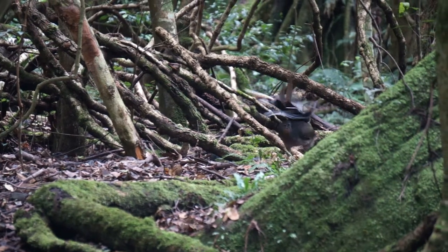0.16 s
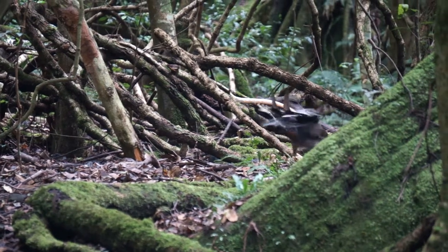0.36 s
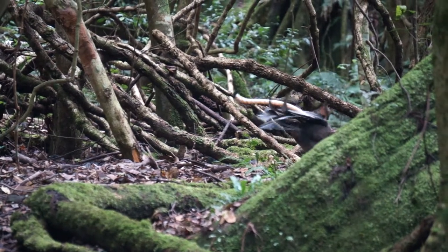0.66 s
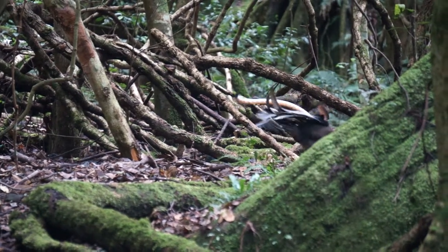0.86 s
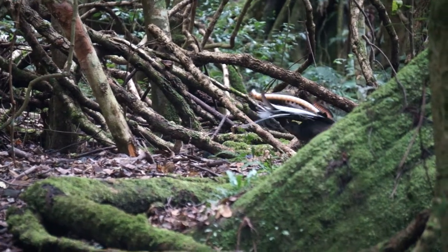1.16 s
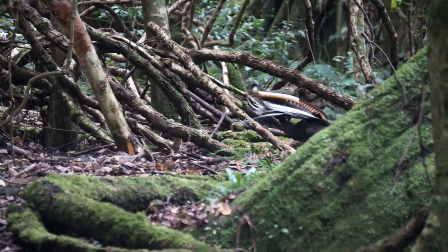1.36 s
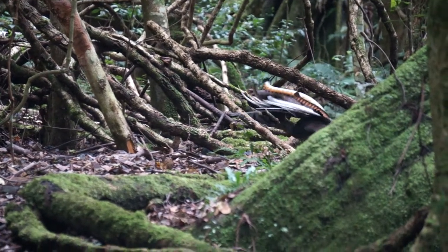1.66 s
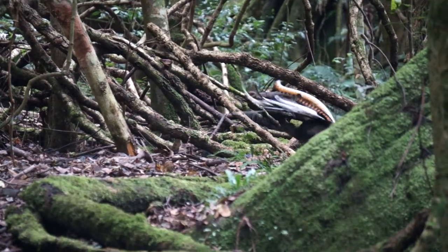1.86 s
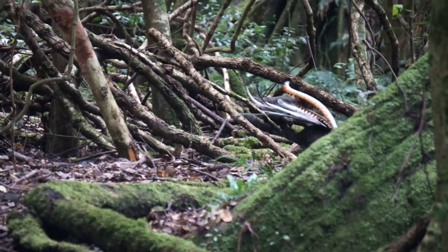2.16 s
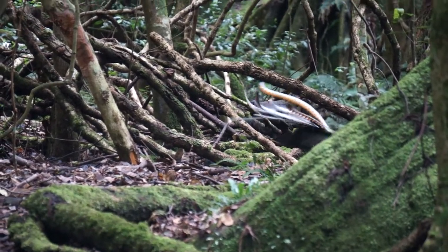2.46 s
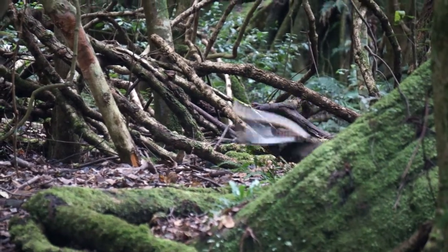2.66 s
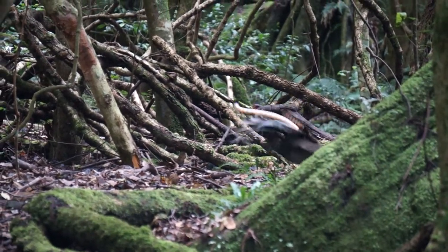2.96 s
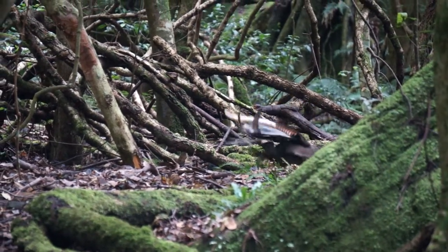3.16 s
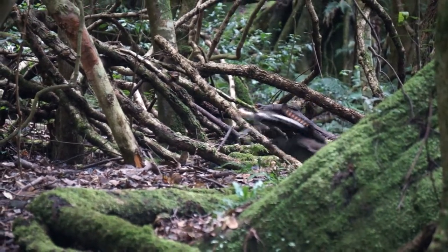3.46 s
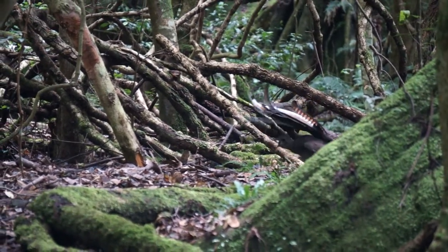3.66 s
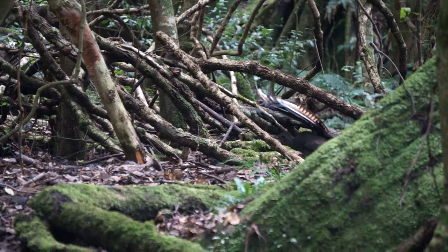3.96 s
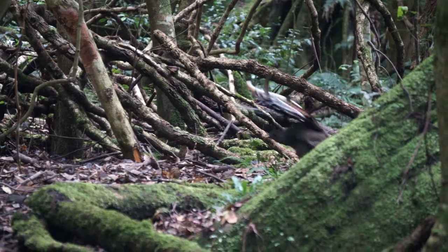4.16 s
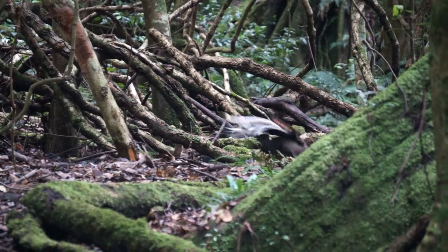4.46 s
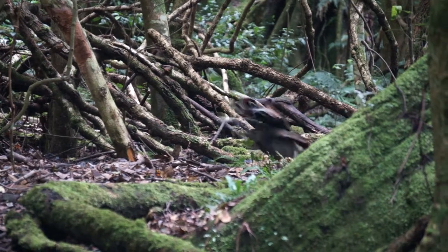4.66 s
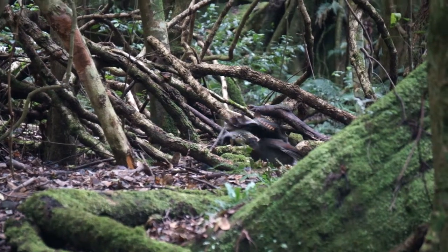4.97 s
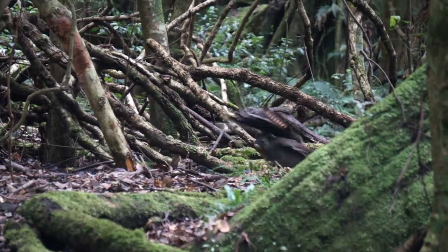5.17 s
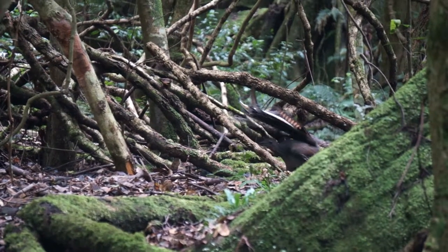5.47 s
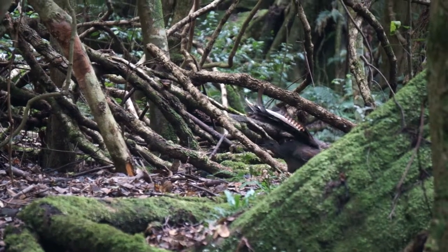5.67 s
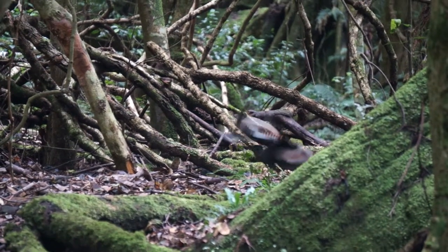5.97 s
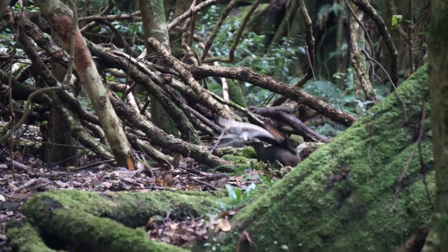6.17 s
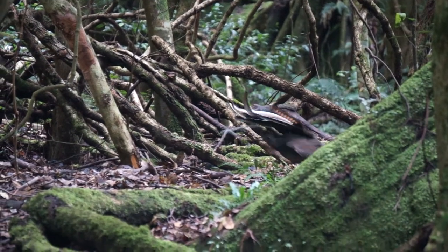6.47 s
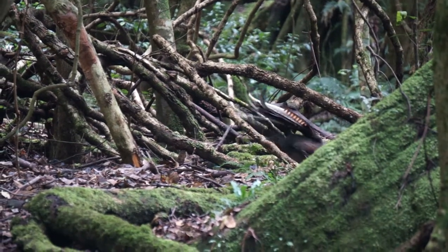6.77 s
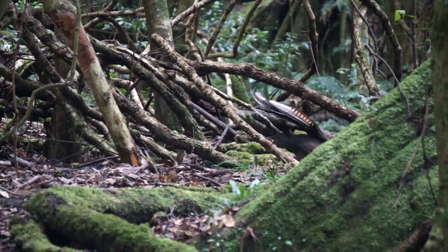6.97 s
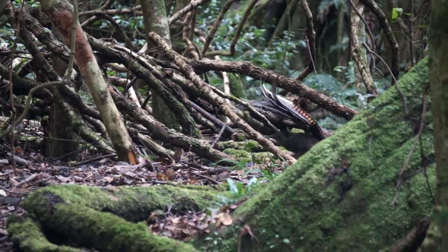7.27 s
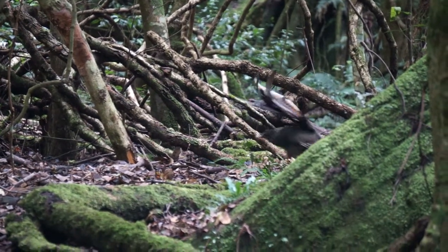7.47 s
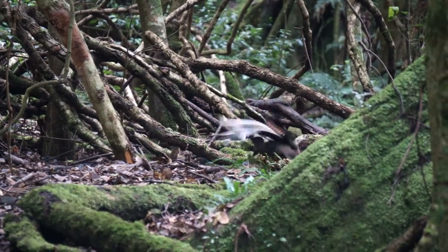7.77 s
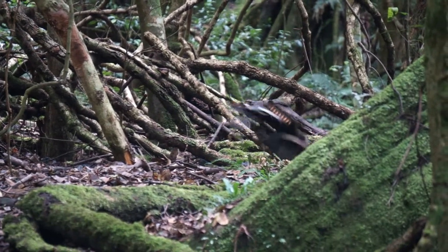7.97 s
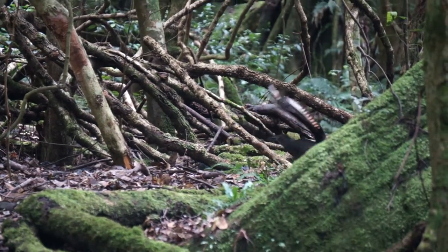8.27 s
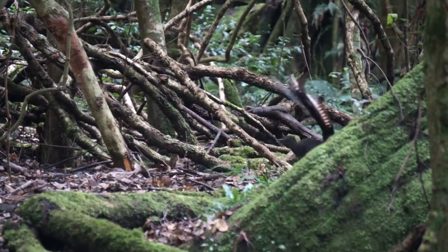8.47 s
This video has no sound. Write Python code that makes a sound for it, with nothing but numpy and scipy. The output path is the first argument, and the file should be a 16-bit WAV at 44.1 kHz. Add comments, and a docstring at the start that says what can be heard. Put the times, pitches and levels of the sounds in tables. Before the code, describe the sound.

A lyrebird dances on a heap of vines in a still rainforest. From 0.1 to 1.4 s come seven irregular clicks, some faint, most sharp: a brief falling woody knock with a whip-like snap and dry crack. Crisp quill rustling and low, fluttering air surround them. At about 2.05, 3.7, 5.35 and 7.0 s a loud note bursts out, near 2 kHz, a tenth of a second of four hard, raspy, pulsing syllables, just preceded by a low soft pip. Echoes scatter off trunks and die within a second. Between calls, pairs of tiny step ticks with feathery swishes (2.7 and 3.15, 4.4 and 4.8, 6.0 and 6.5, 7.6 and 8.1) and isolated softer clicks at 3.3, 5.0, 6.7 and 8.3. Faint high upward slurs repeat about four times a second far away, with occasional thin whistles. Soft gusts swell around 4.3 and 6 s. The background ducks after each call.

```python
"""Lyrebird dance in a rainforest

A lyrebird dances on a heap of vines: sharp clicks (falling knock, snap, dry crack) over rustling tail quills.
Four calls each pair a soft low pip with a loud stuttered note (near-sine pulses and rasp); step ticks between.
Tiny birds whistle far off over a hush, stirred air and gusts of filtered noise; scattered echoes ring.
The recorder's gain ducks under loud peaks and creeps back.
"""
import sys
import numpy as np
from scipy import signal
from scipy.fft import rfft, irfft, next_fast_len
from scipy.io import wavfile
from scipy.ndimage import uniform_filter1d, minimum_filter1d

SR = 44100
rng = np.random.default_rng(int(sys.argv[2]) if len(sys.argv) > 2 else 0)


def to_wav(s):
    """Save 16-bit WAV."""
    ch = np.atleast_2d(s).T  # columns
    pcm = np.round(np.clip(ch, -1, 1) * 32767)  # PCM
    wavfile.write(sys.argv[1], SR, pcm.astype(np.int16))


N = 379701
TIME_S = np.arange(N) / SR

# Left-right correlation of wide sounds: f/Hz, correlation
STEREO_CORRELATION = [(40, 0.65), (100, 0.97), (250, 0.99), (500, 0.76), (1200, 0.73), (2100, 0.71),
                      (4500, 0.75), (10000, 0.82)]

# Forest hush, spectral density: f/Hz, relative level/dB
HUSH_COLOUR = [(24, -42), (40, -23), (75, -13), (118, -1), (160, -5), (250, -2.5), (624, -7), (1050, 2.5),
               (1610, -1.5), (2090, -2.5), (2590, -8), (3520, -11), (5920, -19.5), (7160, -23), (8250, -24),
               (10700, -24), (11500, -41), (15000, -71)]
HUSH_DB = -50

# Air stirred by tail and wings: t of peak/s, half-width/s, level/dB
FLUTTER_SWELLS = [(.78, .78, -53.2), (8.5, .6, -61)]
# Its spectral density: f/Hz, relative level/dB
FLUTTER_SPECTRUM = [(100, -33), (170, 1), (240, 10.5), (340, 5.5), (500, -17), (900, -44.5)]

# Bouts of a tiny bird's upward slur: first t/s, last t/s, period/s
SLUR_BOUT_TIMES = [(.025, 2.45, .238), (2.675, 4.9, .243), (5.68, 8.4, .24)]
# Other far calls: t/s, length/s, f/Hz, level before far trim/dB, pitch flutter/Hz
OTHER_FAR_CALLS = [(1.722, 0.19, 580, -44.5, 4), (1.723, 0.18, 770, -46, 4.5),
                   (2.961, 0.14, 5430, -49.5, 520), (3.164, 0.13, 3910, -44, 66),
                   (3.32, 0.14, 3880, -42, 80), (4.317, 0.13, 3760, -52, 40), (4.93, 0.4, 7405, -57.5, 76),
                   (8.384, 0.16, 5750, -45, 480)]
FAR_PITCH_FALL = .025  # share of pitch

# Scatter from trunks and leaves: f/Hz, level re direct sound/dB
SCATTER_LEVELS = [(600, -20), (1200, -0.5), (2000, -2), (3000, 6.3), (4200, -2), (7000, 8.5), (11000, 2.5)]
# Its decay: f/Hz, t60/s
SCATTER_DECAYS = [(600, 1), (1200, 0.76), (2000, 0.61), (4200, 0.68), (7000, 0.66), (11000, 0.23)]

# Clicks: t/s, knock level/dB, snap level re knock/dB, snap start f/Hz
CLICK_EVENTS = [(0.088, -36, -20, 3500), (0.1346, -24, 0.5, 5200), (0.267, -35.5, -14, 3500),
                (.3741, -25, -2, 3700), (0.6118, -22.5, -2, 5300), (1.0025, -24, 2, 5000),
                (1.3738, -24, -5, 4300), (3.3175, -31, -15, 3700), (4.9812, -29, -15, 3700),
                (6.658, -31, -17, 3700), (8.264, -39, -14, 3700)]
FULL_CLICK_DB = -24  # full effort
KNOCK_HZ, KNOCK_S = 1815, .0041  # at full effort
KNOCK_HZ_PER_DB, KNOCK_S_PER_DB = 10, .00022  # softer: higher, longer

# Dry crack spectrum: f/Hz, relative level/dB
CRACK_COLOUR = [(1500, -14), (3000, 2), (4200, 1), (5600, 0), (6800, 3.5), (8500, -5), (11000, -14.5)]
# Steps: t/s, tick level before trim/dB, swish level before trim/dB
STEP_EVENTS = [(2.7092, -39, -55), (3.1522, -36, -54.5), (4.373, -36, -54.5), (4.816, -39.5, -55.5),
               (6.0327, -41, -57), (6.4911, -36, -53.5), (7.6445, -40, -58), (8.09, -35, -54)]
CRACK_RE_KNOCK_DB = -9  # before tick trim

# Quill ringing bands, spectral density: f/Hz, relative level/dB
QUILL_COLOUR = [(150, -27), (550, -21), (900, -5), (1600, -2), (2600, -2), (3600, -0.5), (4350, 1),
                (5400, -4.5), (6200, -5), (6950, -1.5), (7900, -14), (9000, -11), (10000, -20),
                (11000, -25.5)]
# Tail shakes between clicks: t/s, level before trim/dB
TAIL_SHAKES = [(.72, -41.8), (1.125, -39.8), (1.49, -42.3)]
STRONG_CLICK_DB = -25.8  # full rustle at or above this
RUSTLE_DB, RUSTLE_DB_PER_DB = -41.8, 2.8  # strong-click level before trim; fall per dB of a softer click
RUSTLE_RISE_S, RUSTLE_DECAY_S = .009, .16
SHAKE_RISE_S, SHAKE_DECAY_S = .035, .225
SWISH_RISE_S, SWISH_DECAY_S = .12, .17

# Soft canopy gusts: t of peak/s, half-width/s, level/dB
GUST_SWELLS = [(1.35, .9, -55), (3.4, .7, -59.5), (4.3, .2, -52.5), (6.02, .48, -49.3)]
# Their spectral density: f/Hz, relative level/dB
GUST_COLOUR = [(50, -32), (150, -9), (350, 3.5), (700, 5.5), (1200, 3), (2200, -11), (4000, -66)]

# Calls, pip then note: note t/s, note f/Hz, glide per syllable/Hz, level/dB, rasp/dB, pip lead/s, pip f/Hz
CALLS = [(2.0575, 1962, 50, -2.8, .5, .0355, 1232), (3.7055, 2120, -27, -3.5, 1, .0405, 1174),
         (5.3565, 2034, -21, -3.6, -2.5, .0375, 1217), (7.0015, 2040, -9, -3.2, 0, .0395, 1180)]
# Pip harmonics 1, 2, ..: level/dB
PIP_HARMONICS_DB = [0, -31, -30, -40]
PIP_DB, PIP_S, PIP_ECHO_S = -23, .028, .02
PIP_SHARP = .13  # share of pitch at onset

# Note harmonics 1, 2, ..: level/dB
NOTE_HARMONICS_DB = [-0.5, -24.5, -46, -40, -41]
# Pulses within one syllable: relative level/dB
SYLLABLE_PULSES_DB = [-1, 0, -1, -8]
# Syrinx rasp shaped by throat and beak, spectral density: f/Hz, relative level/dB
RASP_COLOUR = [(900, -37), (1550, -24), (2800, -8.5), (3600, 6.5), (4400, 5.5), (4800, 1), (5700, -15.5),
               (6700, -6), (7500, -15), (8500, -3), (9600, -15), (10800, -10.5)]
PULSE_S, PULSE_FALL = .005, .04  # length; downward slide, share of pitch
PULSE_GAP_S, PULSE_SLOWING_S = .0051, .0003  # onset spacing; growth per syllable
FIRST_GAP_S, GAP_S = .032, .026  # between syllable onsets
SYLLABLE_FADE_DB = 0.8  # per syllable

CUTOFF_HZ = 11210


def from_db(db):
    """Decibels to gain."""
    return 10 ** (np.asarray(db) / 20)


def rms_one(x):
    """Scale to unit power."""
    return x / np.sqrt(np.mean(x ** 2) + 1e-20)


def at_hz(points, hz):
    """Read a table on a log-frequency axis."""
    freqs, values = np.transpose(points)
    return np.interp(np.log(np.maximum(hz, 1)), np.log(freqs), values)


def add(track, s, sound):
    """Mix a sound into a track at a time in seconds."""
    start = max(0, round(s * SR))
    track[start:start + len(sound)] += sound[:N - start]


def drift(rate_hz, size):
    """Interpolate between unit-spread random knots."""
    positions = np.arange(size) * rate_hz / SR
    knots = rng.standard_normal(int(positions[-1]) + 2)
    return np.interp(positions, np.arange(len(knots)), knots)


def progress(length_s):
    """Ramp from 0 to 1."""
    return np.linspace(0, 1, max(8, int(length_s * SR)))


def coloured(x, colour):
    """Shape a spectrum by a table."""
    size = next_fast_len(x.shape[-1])
    gain = from_db(at_hz(colour, np.fft.rfftfreq(size, 1 / SR)))
    return irfft(rfft(x, size) * gain, size)[..., :x.shape[-1]]


def spread(pair):
    """Mix two unrelated noises into a partly correlated left and right."""
    size = next_fast_len(pair.shape[-1])
    alike = np.clip(at_hz(STEREO_CORRELATION, np.fft.rfftfreq(size, 1 / SR)), 0, 1)
    mid, side = rfft(pair, size)
    both = np.sqrt(1 + alike) * mid + np.sqrt(1 - alike) * side * [[1], [-1]]
    return irfft(both, size)[:, :pair.shape[-1]] / np.sqrt(2)


def air(colour):
    """Wide steady noise of unit power."""
    return rms_one(coloured(spread(rng.standard_normal((2, N))), colour))


def swells(rows):
    """Gain track of bell-shaped swells, summed in power."""
    power = 0
    for s, half_width_s, db in rows:
        bell = np.exp(-((TIME_S - s) / half_width_s) ** 2)
        power = power + (from_db(db) * bell) ** 2
    return np.sqrt(power)


def whistle(hz, harmonics_db=(0,)):
    """Harmonic sines following a pitch track; near-pure when harmonics are weak."""
    phase = 2 * np.pi * np.cumsum(hz) / SR
    return sum(from_db(db) * np.sin(k * phase) for k, db in enumerate(harmonics_db, 1))


def hush():
    """Forest background: steady noise weighted toward the low end."""
    return from_db(HUSH_DB) * air(HUSH_COLOUR)


def flutter():
    """Air stirred by tail and wings: low noise in swells."""
    return swells(FLUTTER_SWELLS) * air(FLUTTER_SPECTRUM)


def far_birds(slur_s=0.056, low_hz=6650, high_hz=8050, waver_hz=170, slur_db=-58.5, far_db=-8,
              stray_s=.008, vary_db=1.5):
    """Thin canopy slurs, whistles and buzzes: sines with gliding, randomly fluttering pitch."""
    out, u = np.zeros(N), progress(slur_s)
    for first, last, period in SLUR_BOUT_TIMES:
        for s in np.arange(first, last, period):
            pitch_hz = low_hz + (high_hz - low_hz) * u + waver_hz * drift(405, len(u))
            start_s = s + stray_s * rng.standard_normal()
            gain = from_db(slur_db + vary_db * rng.standard_normal())
            add(out, start_s, gain * np.sin(np.pi * u) * whistle(pitch_hz))
    for s, length_s, hz, db, flutter_hz in OTHER_FAR_CALLS:
        u = progress(length_s)
        pitch_hz = hz * (1 + FAR_PITCH_FALL * (.5 - u)) + flutter_hz * drift(820, len(u))
        add(out, s, from_db(db + far_db) * np.sin(np.pi * u) * whistle(pitch_hz))
    return out


def forest_echoes(build_s=0.024, late_db=-24, late_t60_s=2.38, grain_db=4):
    """Scatter builds as sound reaches more trunks, then dies band by band, leaving a faint long tail."""
    size = 2 * SR
    t, hz = np.arange(size) / SR, np.fft.rfftfreq(size, 1 / SR)
    grains = rng.standard_normal((2, size)) * from_db(grain_db * drift(600, size))
    spectrum = rfft(rms_one(spread(grains)))
    centres_hz, out = np.geomspace(500, 12000, 12), 0
    # overlapping triangular bands on log frequency
    for centre_hz, own in zip(centres_hz, np.eye(len(centres_hz))):
        band = irfft(spectrum * at_hz(np.c_[centres_hz, own], hz), size)
        early = from_db(-60 * t / at_hz(SCATTER_DECAYS, centre_hz))
        late = from_db(late_db - 60 * t / late_t60_s)
        decay = (1 - np.exp(-t / build_s)) * (early + late)
        decay = decay / np.sqrt(np.sum(decay ** 2))
        out = out + band * decay * from_db(at_hz(SCATTER_LEVELS, centre_hz))
    return out


def clicks(fall=0.27, fade=0.64, snap_low_hz=2900, snap_s=0.00167, snap_noise=0.08):
    """A short knock, falling in pitch, opens with a snap that whips down from the treble."""
    out, v = np.zeros(N), progress(snap_s)
    snap_envelope = np.sqrt(np.abs(np.sin(np.pi * v)))
    for s, db, snap_db, snap_high_hz in CLICK_EVENTS:
        softer_db = FULL_CLICK_DB - db
        hz = KNOCK_HZ + KNOCK_HZ_PER_DB * softer_db
        u = progress(KNOCK_S + KNOCK_S_PER_DB * softer_db)
        envelope = np.minimum(20 * u, 1) * (1 - u ** 6) * np.exp(-fade * u)
        knock = whistle(hz * (1 + fall * (.5 - u))) * envelope
        whip = whistle(snap_high_hz + (snap_low_hz - snap_high_hz) * v)
        whip = whip + snap_noise * rng.standard_normal(len(v))
        add(out, s, from_db(db) * knock)
        add(out, s, from_db(db + snap_db) * snap_envelope * whip)
    return out


def ticks(decay_s=0.0024, trim_db=-3):
    """Tiny dry cracks of steps and clicks: decaying coloured noise."""
    out, t = np.zeros(N), np.arange(SR // 100) / SR
    events = [(s, db) for s, db, _ in STEP_EVENTS]
    events += [(s, db + CRACK_RE_KNOCK_DB) for s, db, *_ in CLICK_EVENTS]
    for s, db in events:
        crack = rms_one(coloured(rng.standard_normal(len(t)), CRACK_COLOUR))
        add(out, s, from_db(db + trim_db) * crack * np.exp(-t / decay_s))
    return out


def rustles():
    """Clicks, shakes and steps stir the quills: rows of t/s, rise/s, level before trim/dB, decay/s."""
    rows = []
    for s, db, *_ in CLICK_EVENTS:
        level_db = RUSTLE_DB + RUSTLE_DB_PER_DB * min(db - STRONG_CLICK_DB, 0)
        rows.append((s, RUSTLE_RISE_S, level_db, RUSTLE_DECAY_S))
    rows += [(s, SHAKE_RISE_S, db, SHAKE_DECAY_S) for s, db in TAIL_SHAKES]
    rows += [(s, SWISH_RISE_S, db, SWISH_DECAY_S) for s, _, db in STEP_EVENTS]
    return rows


def quills(per_s=3000, size_db=2.0, trim_db=2.0, clump_db=1.6, ring_s=.012, ring_db=-1):
    """Quills and leaves touch thousands of times a second, in clumps; many close modes ring briefly."""
    touches = (rng.random((2, N)) < per_s / SR) * rng.choice([-1, 1], (2, N))
    sizes_db = size_db * np.minimum(rng.exponential(1, (2, N)), 4)
    touches = touches * from_db(sizes_db + clump_db * drift(75, N))
    power, t = np.zeros(N), np.arange(SR) / SR
    ring = rng.standard_normal(SR) * np.exp(-t / ring_s)
    ring = ring[None] / np.linalg.norm(ring)
    touches = touches + from_db(ring_db) * signal.fftconvolve(touches, ring, axes=1)[:, :N]
    for s, rise_s, db, decay_s in rustles():
        envelope = np.minimum(t / rise_s, np.exp((rise_s - t) / decay_s))
        add(power, s, (from_db(db) * envelope) ** 2)
    return from_db(trim_db) * np.sqrt(power) * rms_one(coloured(spread(touches), QUILL_COLOUR))


def gusts():
    """Soft gusts in the canopy: noise in swells."""
    return swells(GUST_SWELLS) * air(GUST_COLOUR)


def pips(settle=.17, echo_db=-5):
    """A short near-pure note drops onto its pitch, answered by a near trunk."""
    out, u = np.zeros(N), progress(PIP_S)
    for s, *_, lead_s, hz in CALLS:
        pitch_hz = hz * (1 + PIP_SHARP * np.exp(-u / settle))
        note = from_db(PIP_DB) * np.sin(np.pi * u) * whistle(pitch_hz, PIP_HARMONICS_DB)
        add(out, s - lead_s, note)
        add(out, s - lead_s + PIP_ECHO_S, from_db(echo_db) * note)
    return out


def syllables(count=4):
    """Notes stutter, glide, fade and slow: rows of t/s, f/Hz, level/dB, rasp/dB, pulse spacing/s."""
    rows = []
    for s, hz, glide_hz, db, rasp_db, _, _ in CALLS:
        for k in range(count):
            spacing_s = PULSE_GAP_S + k * PULSE_SLOWING_S
            rows.append((s, hz + k * glide_hz, db - k * SYLLABLE_FADE_DB, rasp_db, spacing_s))
            s = s + (GAP_S if k else FIRST_GAP_S)
    return rows


def loud_notes(scatter=0.036, jitter_s=.0003, rasp_db=-26.3):
    """Syllables are bursts of pulses, each on its own pitch, with rasp while the syrinx is open."""
    out, opening = np.zeros(N), np.zeros(N)
    u = progress(PULSE_S)
    swell = np.sin(np.pi * u)
    for s, hz, db, own_rasp_db, spacing_s in syllables():
        for k, pulse_db in enumerate(SYLLABLE_PULSES_DB):
            pitch_chance, time_chance = rng.standard_normal(2)
            pitch_hz = hz * (1 + scatter * pitch_chance + PULSE_FALL * (.5 - u))
            start_s = s + k * spacing_s + jitter_s * time_chance
            envelope = from_db(db + pulse_db) * swell
            add(out, start_s, envelope * whistle(pitch_hz, NOTE_HARMONICS_DB))
            add(opening, start_s, from_db(own_rasp_db) * envelope * swell)
    rasp = rms_one(coloured(rng.standard_normal(N), RASP_COLOUR))
    return out + from_db(rasp_db) * opening * rasp


def scene(pan_db=0.8, note_wet_db=-0.4, pip_wet_db=-2, click_wet_db=-1, far_wet_db=-2):
    """Lyrebird, loud notes aimed a little right, in the echoes and hush of the forest."""
    notes, pip, snaps, far = loud_notes(), pips(), clicks() + ticks(), far_birds()
    echoes = forest_echoes()
    loud = notes + from_db(note_wet_db) * signal.fftconvolve(notes[None], echoes, axes=1)[:, :N]
    sent = from_db(pip_wet_db) * pip + from_db(click_wet_db) * snaps + from_db(far_wet_db) * far
    soft = pip + snaps + far + signal.fftconvolve(sent[None], echoes, axes=1)[:, :N]
    dance = quills() + flutter()
    forest = hush() + gusts()
    return loud * from_db([[-pan_db], [pan_db]]) + soft + dance + forest


def record(dry, limit_db=-6.0, release_db_per_s=9, low_cut_hz=58):
    """Gain drops at once on loud peaks and creeps back; deep bass and top are cut."""
    low_cut = signal.butter(2, low_cut_hz, "high", fs=SR, output="sos")
    sound = signal.sosfilt(low_cut, dry)
    peak_db = 20 * np.log10(np.abs(sound).max(axis=0) + 1e-9)
    over_db = np.maximum(peak_db - limit_db, 0)
    release_db = release_db_per_s * TIME_S
    held_db = np.maximum.accumulate(over_db + release_db) - release_db
    gain = uniform_filter1d(minimum_filter1d(from_db(-held_db), size=128), size=128)
    top_cut = signal.ellip(12, .2, 80, CUTOFF_HZ, fs=SR, output="sos")
    return signal.sosfilt(top_cut, sound * gain)


dry = scene()
out = record(dry)
to_wav(out)
```